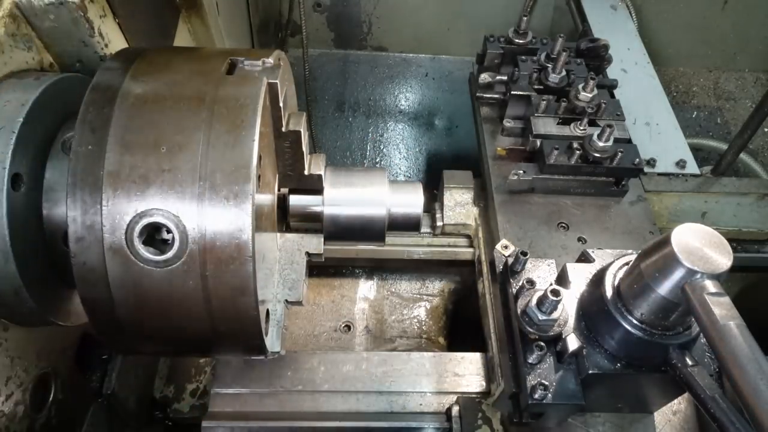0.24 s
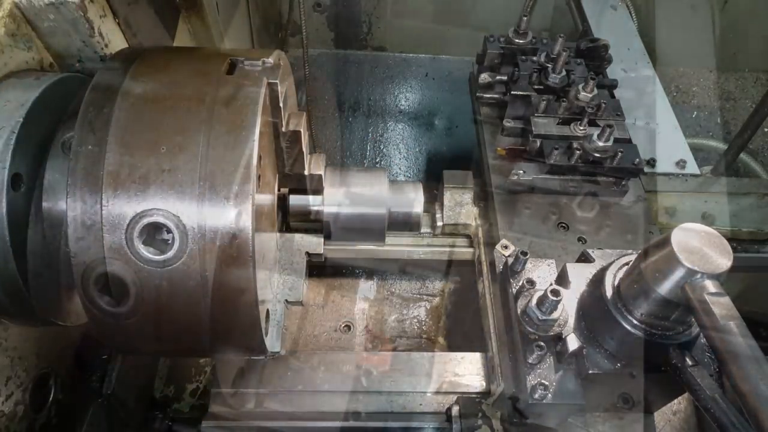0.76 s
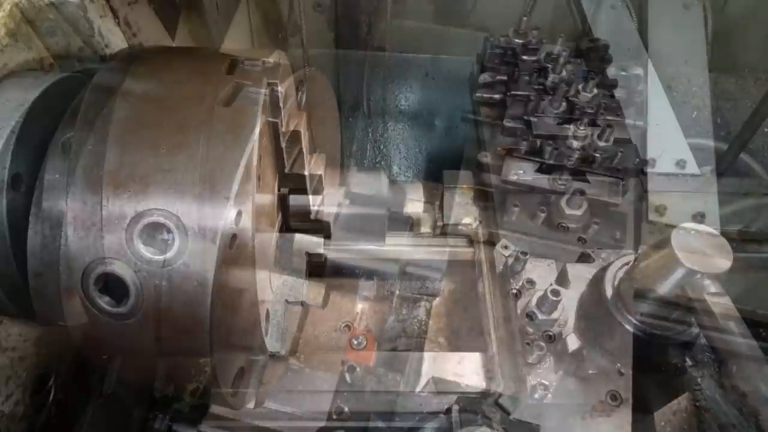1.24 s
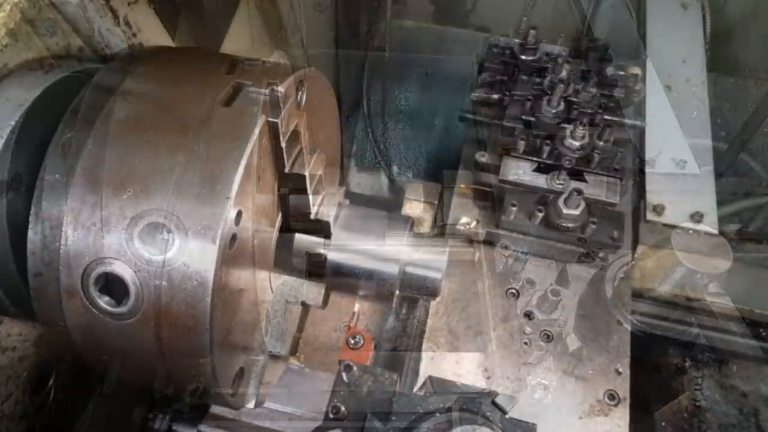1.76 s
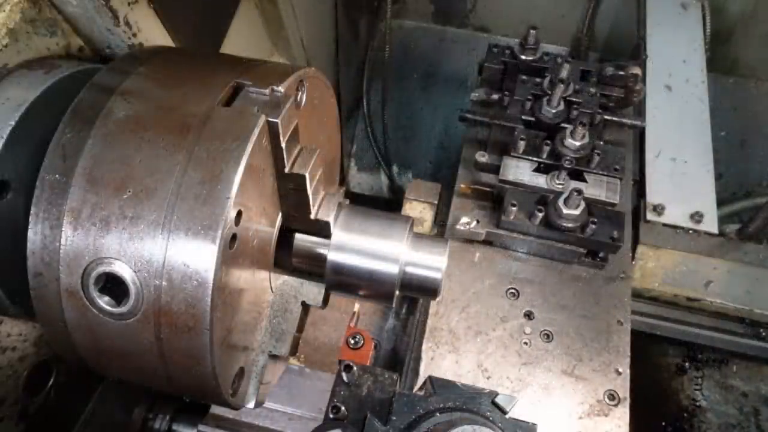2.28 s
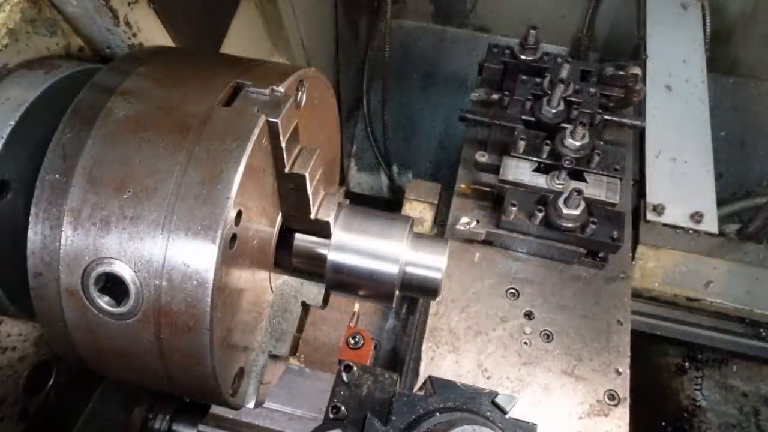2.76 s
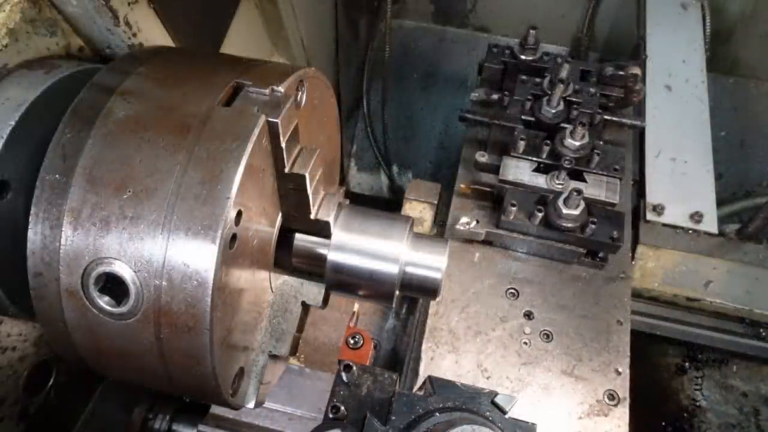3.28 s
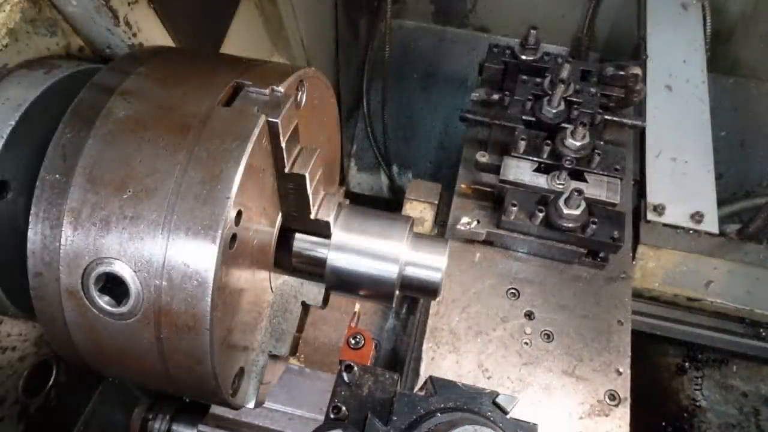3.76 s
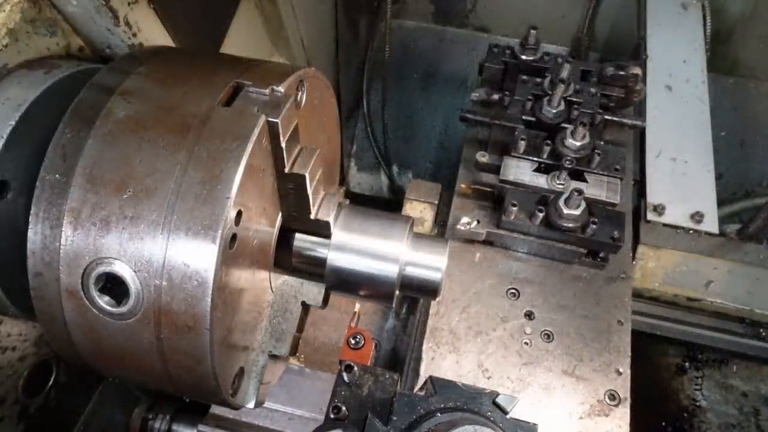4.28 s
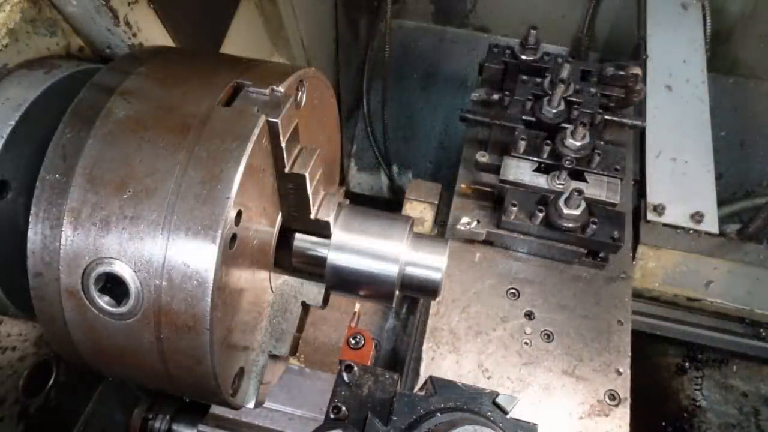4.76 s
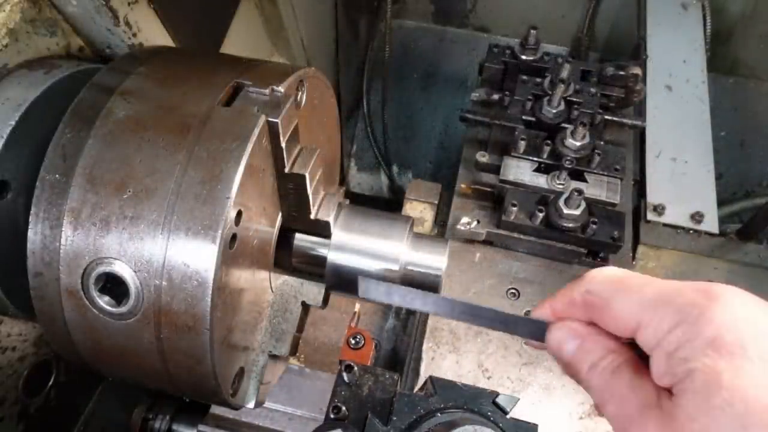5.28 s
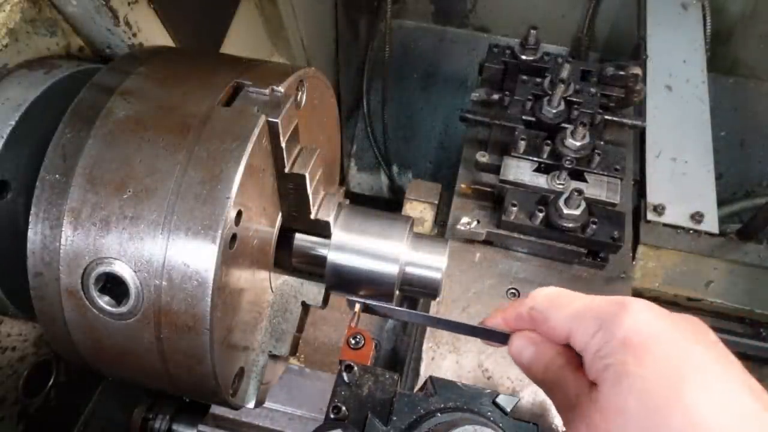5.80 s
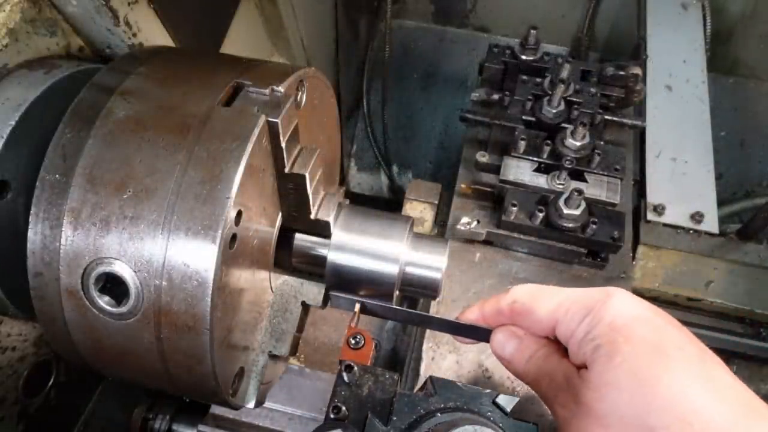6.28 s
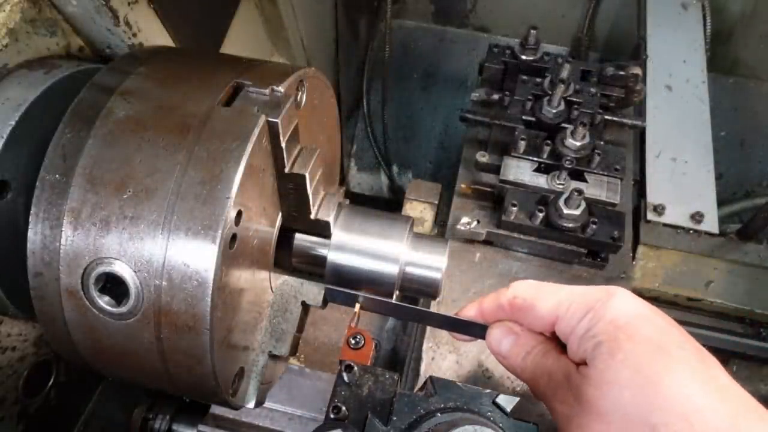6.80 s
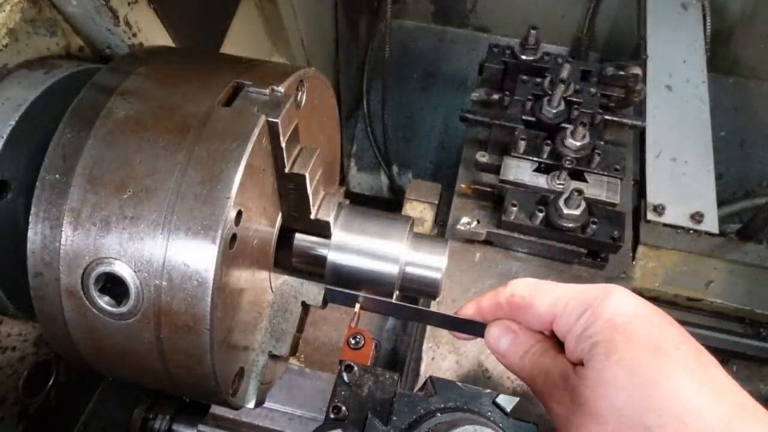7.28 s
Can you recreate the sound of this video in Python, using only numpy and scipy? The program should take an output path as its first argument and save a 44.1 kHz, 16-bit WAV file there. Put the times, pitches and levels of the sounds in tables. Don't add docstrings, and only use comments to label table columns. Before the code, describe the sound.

Close cloth rustle and a soft thump over a faint workshop hum. At once a steel key clangs bright against a lathe chuck, skids in a dense chatter and seats with lower knocks. Scattered clicks follow, then a sharp double knock, a heavy ringing clunk further off and a firm mid-pitched clack under a thin squeal. Light rule ticks end it. Small live room, small close stereo microphone.

```python
import sys
import numpy as np
from scipy import signal
from scipy.fft import rfft, irfft, next_fast_len
from scipy.io import wavfile
from scipy.ndimage import uniform_filter1d

SR = 44100
rng = np.random.default_rng(int(sys.argv[2]) if len(sys.argv) > 2 else 0)


def attenuation_scalar(level_db):
    decades = np.asarray(level_db, float) / 20
    return 10 ** decades


def dump_mix(stems):
    frames = np.atleast_2d(stems).T
    limited = np.clip(frames, -1, 1)
    pcm = np.round(limited * 32767).astype(np.int16)
    wavfile.write(sys.argv[1], SR, pcm)


N = 332514
T = np.arange(N) / SR
BANDS_HZ = 55 * 2 ** np.arange(0, 8.2, .25)
OPPOSED = np.array([[1], [-1]])

BAR_HZ = 2254, 3615, 4466, 5299, 5630, 6439, 6618, 7711, 8368, 9224, 10310, 11050, 14005, 14205
BAR_DB = -18.5, -8.5, -13.5, -11.5, -7.5, -16, -11, -10.5, -22, -12, -13, -20.5, -23, -18
HANDLE_HZ = 3680, 3782, 5560, 8237, 8413, 12970, 13250, 14990
HANDLE_DB = -14.5, -12.5, -14, -17, -16.5, -31, -28, -35
# time_s, level_db
KEY_SKID = [(.76, -12), (.79, -16), (.83, -11.5), (.86, -16.5), (.88, -18), (.92, -28), (.94, -38),
            (.957, -30), (1.01, -52)]
# time_s, pitch_hz, level_db
KEY_SONG = [(.758, 3584, -28), (.845, 3615, -30), (.858, 3750, -35), (.9, 3690, -41), (.93, 3790, -32),
            (.97, 3840, -34), (1.0, 3750, -50), (1.1, 3750, -64), (1.19, 3830, -58)]

# (start_s, level_db, chatter_ms)
KEY_SEATED = [(591, -6.5, 0.27), (755, -32, 0.41), (1600, -13.5, 0.29), (2382, -3, 0.06), (3790, -5, 0.1),
              (4100, -18, 0.06), (4860, -27, 0.056), (5416, -11, 0.18), (6500, -8, 0.044),
              (7800, -21, 0.25), (9670, -17, 0.095), (10260, -17, 0.055)], [(.89, -43, 7.2), (.925, -36, 6),
              (.957, -30, 2.9), (.987, -33, 1.7)]
CASTING_RING = [(237.5, -4.5, 0.45), (290, -2.5, 5.0), (1610, -3, 0.067), (2440, -7, 0.16),
                (3900, -32.5, 0.47), (4980, -7, 0.25), (5140, -9, .25), (4700, -13, 0.22), (4790, -5, 0.3),
                (5420, -12, 0.47), (6000, -15, 0.64), (6400, -24, 0.53), (7700, -12.5, 0.29),
                (8010, -32, 0.27)], [(3.555, -42.5, 3.4), (3.592, -39, 21), (3.665, -45, 6.4),
                (3.988, -58, 2)]
BED_RING = [(415, -12, 0.45), (490, -4, 0.4), (570, -9, 0.38), (630, -4, 0.4), (690, -4, 0.32),
            (856, -14, 0.2), (1076, -13, 0.14), (1236, -17, 0.11)], [(3.555, -48, 1.1), (3.597, -41, 4.8),
            (3.617, -54, 2.4), (3.667, -45.5, 3)]
JAWS_RING = [(550, -10, 0.18), (604, -9, 0.21), (652, -10, 0.2), (827, 5.5, .03), (947, -9, 0.11),
             (1114, -7.5, .12), (1444, -17, 0.11), (1650, -6, 0.1), (2400, -7, 0.072), (2630, -8, 0.1),
             (2762, -12, .12)], [(5.04, -49, 4.1), (5.0552, -34.5, 0.78), (5.071, -38, 3.4),
             (5.112, -41, 4), (5.13, -43, 0.85)]
RULE_RING = [(1918, -1.5, 0.076), (2640, -6.5, 0.023), (5100, -14, 0.015), (6640, -17, 0.011),
             (8500, -7.5, 0.0089), (12400, -18, .015)], [(5.948, -44.5, 3.1), (6.46, -51, 9.2),
             (6.538, -45, 8), (6.551, -47, 2)]
TOOL = [(2550, -14, .03), (3150, 1.5, 0.085), (4020, -4, .03), (5200, -13, .02)], [(4.162, -45, 3.5),
        (4.268, -56, 3.2)]

# start_s, peak_db, strongest_ring_hz, treble_db, chatter_ms
KNOCKS = [(1.188, -41, 1470, -25, 4.5), (1.224, -36.5, 1600, -35, 0.95), (1.319, -44.5, 1260, -1, 4.5),
          (1.861, -34.5, 1600, -23, 1.3), (1.906, -44, 1580, -38, 3.5), (2.069, -41, 1760, -21, 3.3),
          (2.084, -27.5, 1580, -30, 3.3), (2.169, -43.5, 1670, -7, 4), (2.705, -30, 2570, -8, 0.76),
          (2.73, -37.5, 2960, -14, 5.4), (2.838, -25.5, 1870, -15, 2.4), (2.843, -16.5, 2340, -12, 1.17),
          (3.16, -43.5, 2106, -34, .9), (3.512, -34, 1770, -39, 14), (3.52, -29.5, 1840, -32, 0.93),
          (5.418, -41.5, 1600, -32, 13)]
CLUNKS = [(0.019, -47.5, 202, -44, 3.5), (0.171, -44, 363, -18, 1.6), (3.5545, -24.5, 286, -11.5, 1.8),
          (3.589, -14.5, 290, -1, 3.1), (3.5975, -16.5, 252, -11.5, 0.56), (3.618, -42, 266, -14, 3.4),
          (3.669, -32.5, 270, -2, 2.4), (3.985, -37.5, 1240, -27, 33), (3.988, -31, 4750, -18, .3),
          (5.038, -26.5, 2400, -24, 6.2), (5.055, -19.5, 820, -23.5, .9), (5.07, -25.5, 730, -17.5, 6.4),
          (5.109, -34, 1105, -21, 3.1)]
SEATING = [
    (0.787, -22.5, 567, -10, 70),
    (0.829, -16, 555, -10.5, 13.7),
    (0.862, -24.5, 583, -34, 3.1),
    (0.935, -24.5, 630, -29, 31),
    (0.956, -17, 590, -16.5, 2.6),
    (0.985, -18, 706, -26, 1.8),
]
# start_s, peak_db, strongest_ring_hz, treble_db
TICKS = [(0.171, -40, 2750, -26), (0.589, -48.5, 7940, -8), (0.6584, -46.5, 3330, -30),
         (0.735, -34, 3890, -6), (1.3503, -49, 1610, -13), (1.497, -43.5, 4970, -17.5),
         (4.1649, -36, 3150, -16), (4.219, -49, 2500, -30), (4.272, -44.5, 3150, -25),
         (4.49, -46, 1110, -32), (4.575, -44, 4000, -26), (4.777, -44, 2650, -20),
         (5.261, -37.5, 2650, -19), (5.5151, -29.5, 2480, -3.5), (5.6468, -45, 2750, -37),
         (5.9475, -34, 3150, -17), (6.466, -45, 1750, -16), (6.5437, -40, 1900, -5),
         (6.5529, -32.5, 1970, -11.5), (6.796, -49, 1220, -31)]
# start_s, peak_db, strongest_ring_hz
THUMPS = [(0.009, -50, 162), (0.93, -49, 140), (1.477, -48, 130), (2.719, -41, 160), (2.859, -41.5, 159),
          (3.2, -50.5, 156), (4.049, -60, 159), (5.071, -41, 159)]
# tone (pitch_hz, density_db per Hz), then ring_height_db, ring_width_octaves,
# t60_s at 300 Hz, t60_s at 8 kHz, room_share_db, usual_treble_db
KNOCK_BODY = [(70, -61), (150, -12.5), (300, -17), (700, -14), (1100, -3), (1800, 2), (3000, -8),
              (5400, -21), (9000, -57), (16000, -76)], 6.2, 0.14, 0.25, 0.056, -8, -20
CLUNK_BODY = [(70, -54), (130, -21), (250, -4.5), (700, -4), (1500, -4.5), (2500, -3.5), (4800, -5.5),
              (8000, -12.5), (15500, -20)], 8.9, 0.55, 0.33, 0.19, -2, -14
SEATING_BODY = [(70, -40), (300, -15.5), (700, -9), (1500, -6.5), (2500, -10.5), (5000, -5.5),
                (15500, -27)], 9.6, 0.33, 0.065, 0.1, -12, -11
RULE_ON_WORKPIECE_BODY = [(110, -40), (600, -29), (1100, -12.5), (3000, -16.5), (7000, -14.5),
                          (15500, -28)], 22, 0.16, 0.096, 0.026, -18.5, -20.5
BENCH = [(60, 15), (130, 4), (250, 20.5), (500, -51), (16000, -93.5)], 12.5, 0.28, 0.37, .2, -27, -17
# pitch_hz, t60_s
ROOM_T60 = [(100, 1), (500, 0.55), (2000, 0.43), (6000, 0.41), (14000, 0.29)]

# start_s, length_s, pitch_hz, width_hz, level_db
SQUEAKS = [
    (.98, .22, 5380, 140, -63),
    (1.265, .03, 5320, 60, -56),
    (2.858, .06, 10900, 50, -69),
    (6.13, .3, 9400, 200, -79),
]
# time_s, pitch_hz, level_db
SQUEAL = [(4.7, 2494, -65), (4.85, 2510, -63.5), (5.0, 2535, -60.5), (5.15, 2580, -56), (5.27, 2656, -56.5),
          (5.4, 2680, -59.5), (5.5, 2680, -64), (5.62, 2700, -78)]
# multiple of the pitch, level_db
SQUEAL_PARTIALS = [(.985, 0), (1.046, -4), (1.8, -15)]
# time_s, pitch_hz, level_db
WHISTLE = [(6.11, 13150, -84), (6.18, 13250, -77), (6.26, 13400, -78), (6.31, 13900, -80),
           (6.37, 13750, -79), (6.41, 13300, -73), (6.46, 13200, -82)]

# start_s, length_s, level_db
SLEEVE_STROKES = [
    (-.03, 0.021, -52),
    (0.03, 0.18, -49.5),
    (0.277, 0.22, -54),
    (5.835, 0.13, -63.5),
    (6.42, 0.04, -63),
    (6.495, 0.06, -61.5),
]
# pitch_hz, density_db per Hz
SLEEVE_TONE = [(880, -35), (1500, 3), (1770, -7), (2580, 3), (3860, 1.5), (6450, 7), (15000, 0),
               (15800, -11)]

# pitch_hz, density_db per Hz
SHOP_TONE = [(15, -66), (25, -29), (37, -45), (170, -5), (190, -1.5), (308, -7), (362, -7.5), (488, -12),
             (751, -12.5), (908, -9), (1480, -14), (1830, -13), (2100, -16.5), (14700, -32.5), (15900, -47)]
RUMBLE_TONE = [(15, -69), (25, -41), (56, -13.5), (91, -12), (113, 0), (167, -2.5), (180, -0.5), (230, -41),
               (400, -120)]
# pitch_hz, width_hz, level_db
HUM = [(200, 1.9, -71), (200.4, 6.3, -72), (504.2, 7.2, -76), (899, 45, -72.5), (1770, 100, -77.5)]
# pitch_hz, coherence (0 to 1)
SHOP_LIKENESS = [(60, 0.23), (130, 0.72), (290, 0.68), (640, 0.94), (1410, 0.9), (3100, 1), (6820, 0.97),
                 (15000, 1)]
# time_s, level_db over stillness
STIR = [(0, 5), (.38, 7.5), (.8, 11), (.92, 11), (1.16, 14.5), (1.68, 0.5), (2.04, 5.5), (2.29, 12.5),
        (2.75, 7), (3.55, 1.5), (3.63, 21), (3.88, 12.5), (4.2, 17), (4.6, 12), (5.06, 18.5), (5.59, 5),
        (5.92, 5.5), (7.54, 1.5)]
# start_s, level_db, fade_s
STEPS = [(.02, -69.5, 0.37), (.35, -72.5, 0.6), (.92, -61, 0.21), (1.2, -60.5, 0.32), (1.5, -62.5, 0.18),
         (1.98, -62.5, 0.055), (2.82, -58, 0.23), (3.72, -70, 0.18), (4.03, -78, 0.083), (4.75, -71, 0.11),
         (5.15, -68, 0.11)]
# start_s, level_db, fan range over drone range_db
AFTER = [(.01, -55, -7), (.17, -59, -27), (.42, -57.5, -1), (.86, -53, 2), (2.72, -59.5, 0),
         (2.86, -55.5, 6), (3.63, -43.5, -10), (3.78, -75, -25), (5.15, -54, 5.5)]


def key(bands):
    blow_s, blow_db, skid_t60_s, free_t60_s = .7575, -23.5, 0.14, 0.3
    (skid_db,), on = curve(KEY_SKID)
    a, t = int(blow_s * SR), np.arange(SR // 3) / SR
    pairs = list(zip(BAR_HZ + HANDLE_HZ, BAR_DB + HANDLE_DB))
    fed = [(hz, db, skid_t60_s) for hz, db in pairs]
    free = [(hz, db, free_t60_s) for hz, db in pairs]
    skid = (attenuation_scalar(skid_db - 14) * on)[a:a + len(t)]

    out = np.zeros((2, N))
    out[:, a:a + len(t)] = modes(fed, lambda: sparse(len(t)) * skid, skid_t60_s)
    out[:, a:a + len(t)] += modes(free, lambda: attenuation_scalar(blow_db) * (t == 0), free_t60_s)
    grip_db = np.interp(T, [0.79, 0.9], [0, -15])
    out = out * attenuation_scalar(grip_db) + rung(*KEY_SEATED, 0.24)
    crack = rng.standard_normal(400) * np.exp(-np.arange(400) / 50)
    out[:, a:a + 400] += crack * attenuation_scalar(-17.5)
    dull = noise(lambda f: f ** 2 / (1 + (f / 2800) ** 4.2))
    grit = dull * attenuation_scalar(skid_db - 19.5 + 3.8 * walk(250)) * on

    decay, weight = fade(t, on_log(BANDS_HZ, ROOM_T60)), np.sqrt(BANDS_HZ)
    tails = [weight @ (bands[:, i:i + len(t)] * decay) for i in (0, len(t))]
    heard = (out.mean(axis=0) + grit)[a:a + len(t)]
    mid, side = (signal.fftconvolve(heard, x / np.sqrt(np.sum(x ** 2))) for x in tails)
    out[:, a:a + len(mid)] += attenuation_scalar(-14.5) * (mid + side * OPPOSED)
    return out + grit


def rung(table, hits, t60_top):
    out, t = np.zeros((2, N)), np.arange(SR // 4) / SR
    ending = np.cos(np.pi / 2 * t / t[-1])
    for s, db, chatter_ms in hits:
        swell = np.minimum(2300.0 * t / chatter_ms + 0.13, 1) * np.exp(-1e3 * t / chatter_ms)
        touch = (t == 0) * attenuation_scalar(-0.5 - 2.8 * chatter_ms)
        contacts = lambda: (sparse(len(t)) * swell + touch) * attenuation_scalar(db + 5.0)
        i = int(s * SR)
        out[:, i:i + len(t)] += modes(table, contacts, t60_top) * ending
    return out


def modes(table, contacts, t60_top):
    out = 0
    for hz, db, t60 in table:
        pole = np.exp(2j * np.pi * hz / SR - np.log(1000) / (min(t60, t60_top) * SR))
        ring = signal.lfilter([1], [1, -pole], contacts()).imag
        pan_db = 3 * min(hz / 2000, 1) * rng.standard_normal()
        out = out + panned(attenuation_scalar(db) * ring, pan_db)
    return out


def sparse(size):
    return rng.standard_normal(size) * (rng.random(size) < .02)


def blows(table, body, pan_db, bands):
    tone, ring_db, ring_octaves, t60_low, t60_high, room_db, usual_db = body
    size = 2 ** 14
    out, t = np.zeros((2, N + size)), np.arange(size) / SR
    pool = bands.reshape(len(BANDS_HZ), 4, size).transpose(1, 0, 2)
    ringing = pool * fade(t, on_log(BANDS_HZ, [(300, t60_low), (8000, t60_high)]))
    build_up = (1 - np.exp(-t / 0.0093)) * np.cos(np.pi / 2 * t / t[-1])
    tails = pool * fade(t, on_log(BANDS_HZ, ROOM_T60)) * build_up * attenuation_scalar(room_db)
    cycles = BANDS_HZ[:, None] * t
    contact = np.sin(2 * np.pi * cycles) * cycles * np.exp(1 - cycles)

    for k, (s, db, ring_hz, treble_db, chatter_ms) in enumerate(table):
        tilt_db = on_log(BANDS_HZ, [(2500, 0.0033), (6000, treble_db - usual_db)])
        peak_db = ring_db * np.exp(-(np.log2(BANDS_HZ / ring_hz) / ring_octaves) ** 2)
        shape_db = on_log(BANDS_HZ, tone) + tilt_db + peak_db
        weight = attenuation_scalar(shape_db) * np.sqrt(BANDS_HZ) * rng.choice([-1, 1], size=len(BANDS_HZ))
        grain = attenuation_scalar(2.5 * np.repeat(rng.standard_normal(size // 64), 64))
        rise = 1 - np.exp(-t / max(chatter_ms * 0.00067, 1e-4))
        swell = rise * uniform_filter1d(grain, size=48)
        mid = weight @ ringing[k % 4] * swell + weight @ tails[(k + 1) % 4]
        mid = mid + attenuation_scalar(6.5 - 0.82 * chatter_ms) * weight @ contact
        weight = weight * np.clip(BANDS_HZ / 1200, .15, 1)
        side = attenuation_scalar(-12) * weight @ tails[(k + 2) % 4]
        side = side + attenuation_scalar(-11.0) * weight @ ringing[(k + 3) % 4] * swell
        i = int(s * SR)
        both = panned(mid + side * OPPOSED, pan_db * min(ring_hz / 1000, 1))
        out[:, i:i + size] += both * attenuation_scalar(db) / np.abs(mid).max()
    return out[:, :N]


def wash():
    bell = lambda hz: lambda f: np.exp(-40 * np.log2((f + 1) / hz) ** 2)
    return np.array([noise(bell(hz), size=2 ** 16) for hz in BANDS_HZ])


def squeaks():
    out = wavering(WHISTLE, [(0.97, 0.0041)], 90, 2.5)
    for s, length_s, hz, width_hz, db in SQUEAKS:
        t, i = np.arange(int(length_s * SR)) / SR, int(s * SR)
        envelope = np.clip(4 * np.minimum(t, length_s - t) / length_s, 0, 1)
        out[i:i + len(t)] += narrow(hz, width_hz, size=len(t)) * attenuation_scalar(db) * envelope
    squeal = wavering(SQUEAL, SQUEAL_PARTIALS, 230, 3.8)
    song = wavering(KEY_SONG, [(1, 0)], 160, 3.4, clean=0.62)
    return out + panned(squeal, -3.0) + panned(song, 5.8)


def wavering(table, partials, width_hz, patchy_db, clean=0):
    (hz, db), on = curve(table)
    phase = 2 * np.pi * np.cumsum(hz) / SR
    out = 0
    for multiple, up_db in partials:
        carrier = (clean + (1 - clean) * narrow(0, width_hz)) * np.sin(multiple * phase)
        out = out + carrier * attenuation_scalar(db + up_db + patchy_db * walk(25))
    return np.sqrt(2) * on * out


def sleeve():
    attack_s, release_s = 0.041, 0.11
    stroke = 0
    for s, length_s, db in SLEEVE_STROKES:
        shape = np.minimum((T - s) / attack_s, 1 + (s + length_s - T) / release_s)
        stroke = stroke + attenuation_scalar(db) * np.clip(shape, 0, 1)
    mid, side = (noise(lambda f: attenuation_scalar(on_log(f, SLEEVE_TONE)) * (f > 1500)) for _ in range(2))
    return (mid + attenuation_scalar(-11.5) * side * OPPOSED) * stroke * attenuation_scalar(-1.5 + 1.6 * walk(80.0))


def shop():
    (stir_db,), _ = curve(STIR)
    attack_s, fade_s = 0.017, .12
    steps = swells(STEPS, 0.04)
    drone_after = swells([(s, db, fade_s) for s, db, _ in AFTER], attack_s)
    fans_after = swells([(s, db + up_db, fade_s) for s, db, up_db in AFTER], attack_s)
    layers = [(20, 170, RUMBLE_TONE, -82, 0.076, steps),
              (170, 470, SHOP_TONE, -70, 0.1, drone_after),
              (470, 2600, SHOP_TONE, -65, 0.42, fans_after),
              (2600, 17000, SHOP_TONE, -73.5, 0.96, 0)]
    apart = lambda f: np.sqrt(1 - np.clip(on_log(f, SHOP_LIKENESS), 0, .99))
    out = 0
    for lo, hi, table, still_db, share, power in layers:
        edges = lambda f: np.sqrt((1 + (lo / (f + 1)) ** 8) * (1 + (f / hi) ** 8))
        tone = lambda f: attenuation_scalar(on_log(f, table)) / edges(f)
        side = noise(lambda f: tone(f) * apart(f)) * attenuation_scalar(-12 if hi < 500 else -5.5)
        gain = np.sqrt(attenuation_scalar(2 * (still_db + share * stir_db)) + power) * attenuation_scalar(1.3 * walk(10))
        out = out + (noise(tone) + side * OPPOSED) * gain
    return out + sum(narrow(hz, width_hz) * attenuation_scalar(db) for hz, width_hz, db in HUM)


def swells(table, attack_s):
    t = T[::32]
    power = 0
    for s, db, fade_s in table:
        rise = np.clip((t - s) / attack_s, 0, 1)
        fall = np.exp(-2 * np.maximum(t - s - attack_s, 0) / fade_s)
        power = power + attenuation_scalar(2 * db) * rise * fall
    return np.interp(T, t, power)


def on_log(hz, table):
    f, v = np.transpose(table)
    return np.interp(np.log(np.maximum(hz, 1)), np.log(f), v)


def unit(x):
    return x / np.sqrt(np.mean(x ** 2))


def curve(table):
    s, *columns = np.transpose(table)
    return [np.interp(T, s, c) for c in columns], (T >= s[0]) & (T <= s[-1])


def noise(gain, size=N):
    n = next_fast_len(size)
    spectrum = rfft(rng.standard_normal(n)) * gain(np.fft.rfftfreq(n, 1 / SR))
    return unit(irfft(spectrum, n)[:size])


def narrow(hz, width, size=N):
    return noise(lambda f: 1 / (1 + ((f - hz) / (width / 2)) ** 2), size=size)


def walk(rate):
    k = int(SR / rate)
    held = np.repeat(rng.standard_normal(N // k + 1), k)
    return uniform_filter1d(uniform_filter1d(held, k), k)[:N]


def fade(t, t60):
    return np.exp(-np.log(1000) * t / np.maximum(t60, .005)[:, None])


def panned(x, pan_db):
    return x * attenuation_scalar(np.array([[pan_db], [-pan_db]]) / 2)


def scene():
    bands = wash()
    ticks = [(*row, 2.4) for row in TICKS]
    thumps = [(*row, BENCH[-1], 19) for row in THUMPS]
    struck = key(bands)
    rings = ((CASTING_RING, 0.41), (RULE_RING, .09), (JAWS_RING, .35), (BED_RING, .35), (TOOL, .1))
    for ring, longest_t60_s in rings:
        struck = struck + rung(*ring, longest_t60_s)
    groups = ((KNOCKS, KNOCK_BODY, -1.5), (CLUNKS, CLUNK_BODY, -2), (SEATING, SEATING_BODY, 1.5),
              (ticks, RULE_ON_WORKPIECE_BODY, -2), (thumps, BENCH, 0))
    for table, body, pan_db in groups:
        struck = struck + blows(table, body, pan_db, bands)
    bass_cut = signal.butter(3, 105, "high", fs=SR, output="sos")
    return signal.sosfilt(bass_cut, struck) + squeaks() + sleeve() + shop()


def roll_off(x):
    return signal.sosfilt(signal.butter(12, 16500, fs=SR, output="sos"), x)


def record(dry):
    rising = lambda f: f
    hiss = attenuation_scalar(-69.0) * (noise(rising) + attenuation_scalar(-9) * noise(rising) * OPPOSED)
    top_cut = signal.ellip(12, .2, 70, 15750, fs=SR, output="sos")
    return roll_off(signal.sosfilt(top_cut, dry + hiss))


dry = scene()
out = record(dry)
dump_mix(out)
```